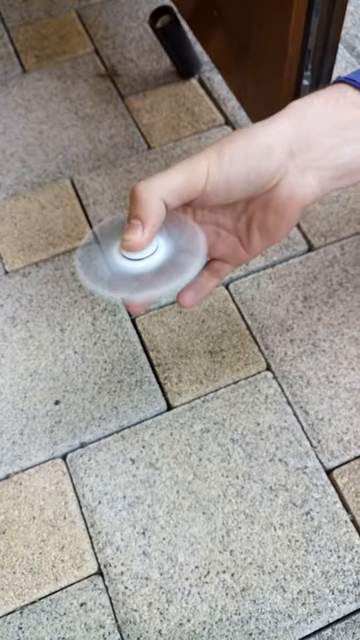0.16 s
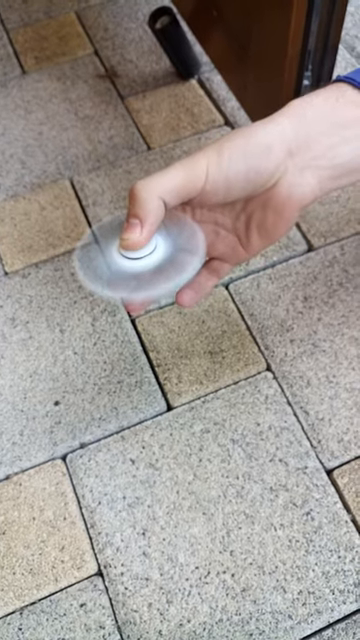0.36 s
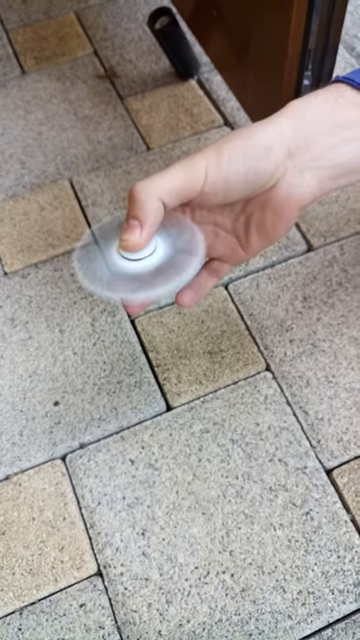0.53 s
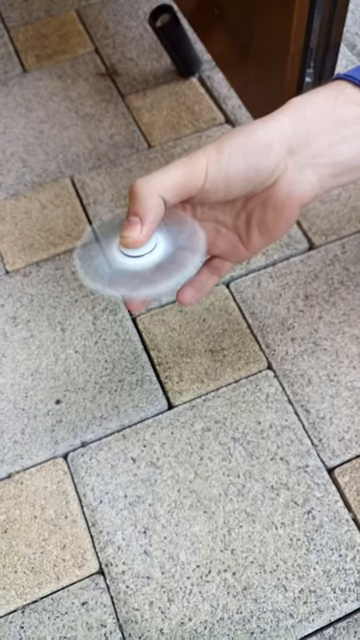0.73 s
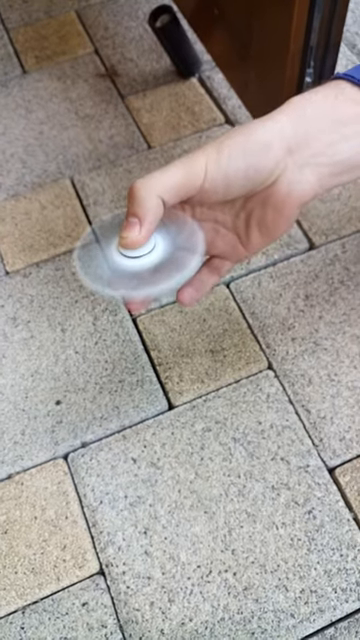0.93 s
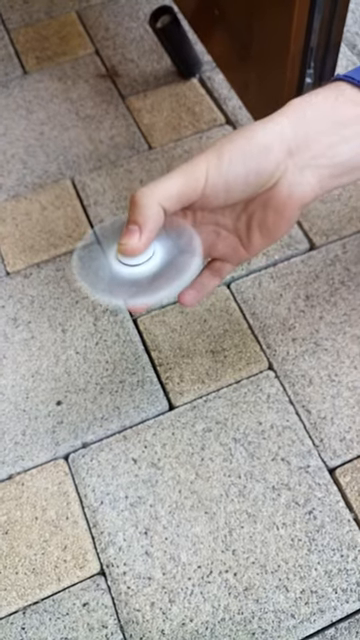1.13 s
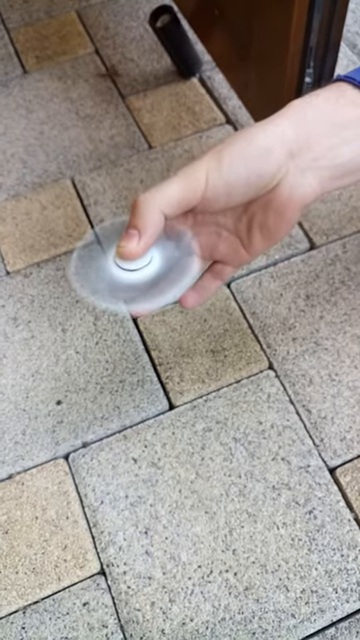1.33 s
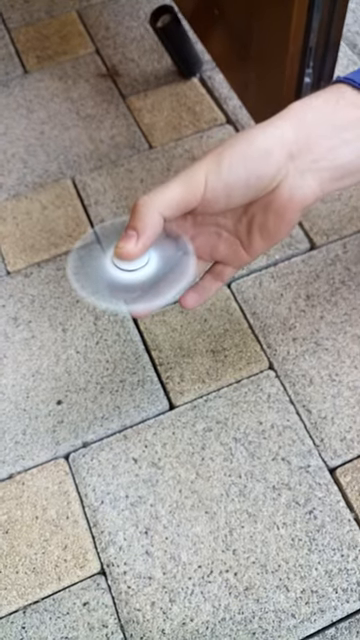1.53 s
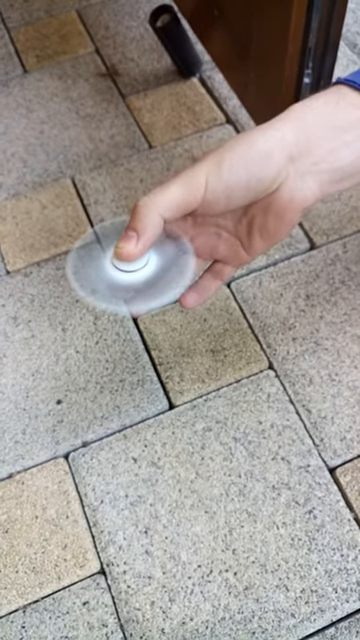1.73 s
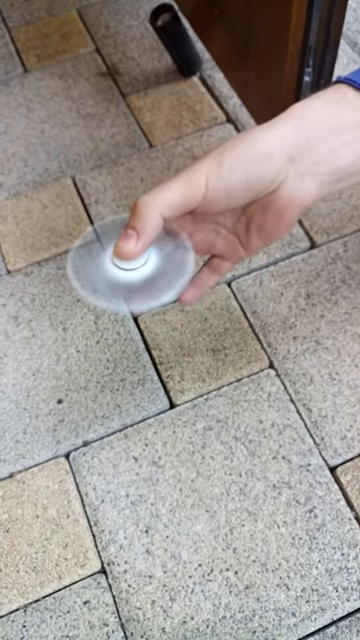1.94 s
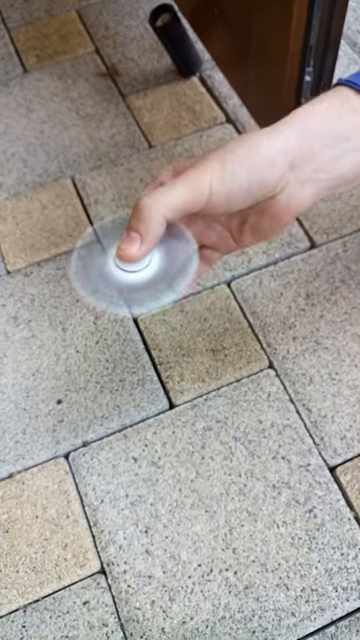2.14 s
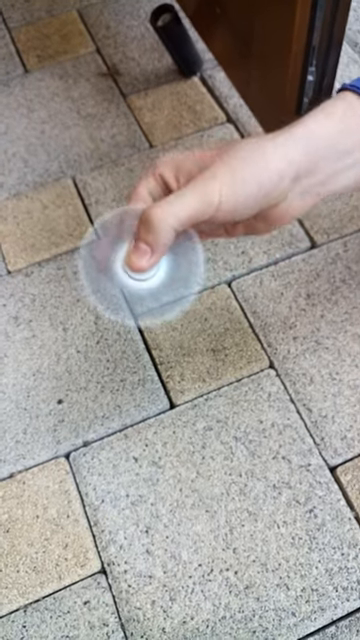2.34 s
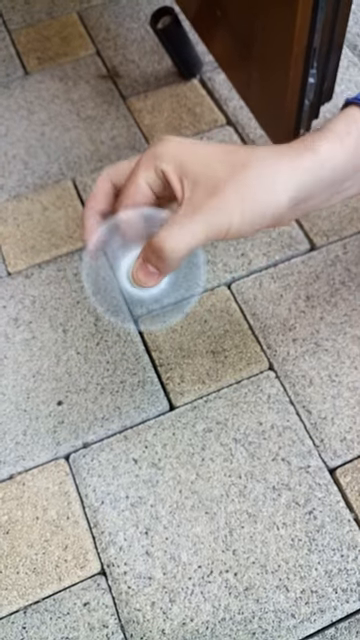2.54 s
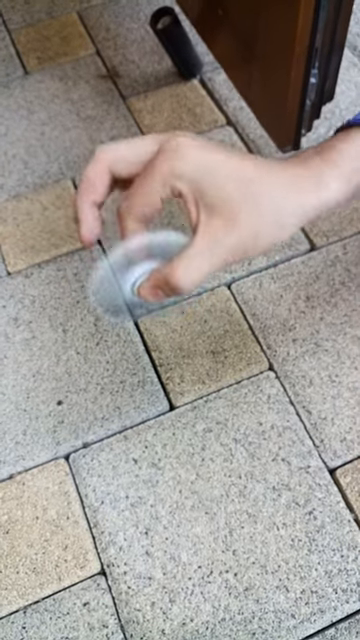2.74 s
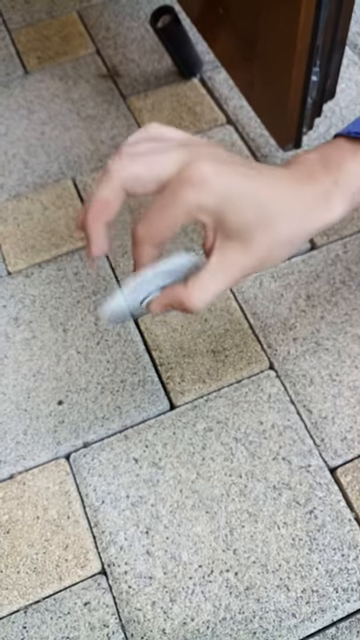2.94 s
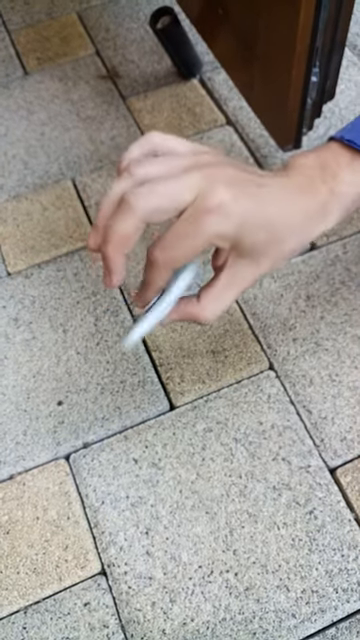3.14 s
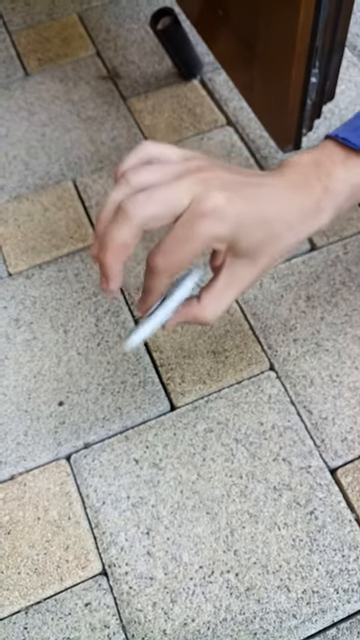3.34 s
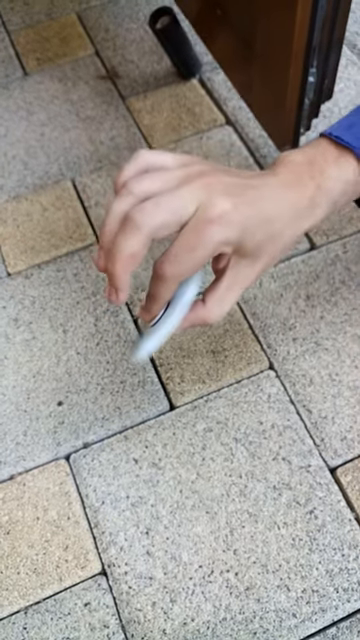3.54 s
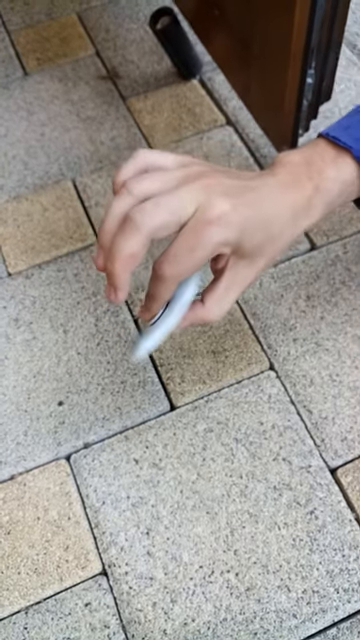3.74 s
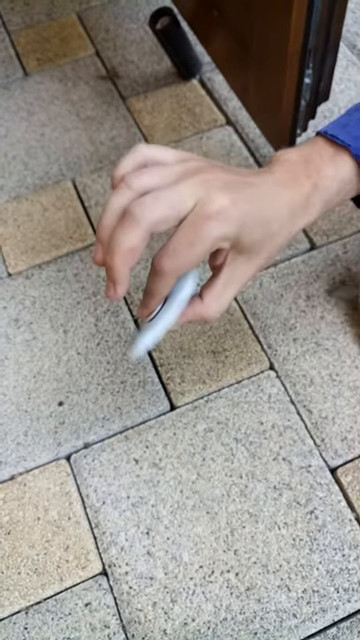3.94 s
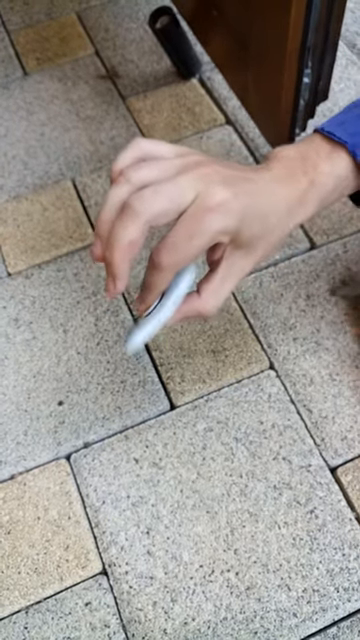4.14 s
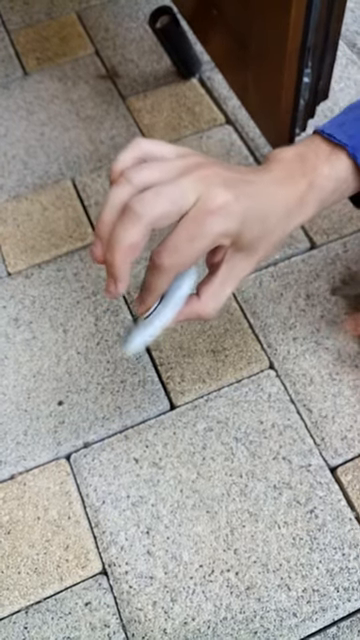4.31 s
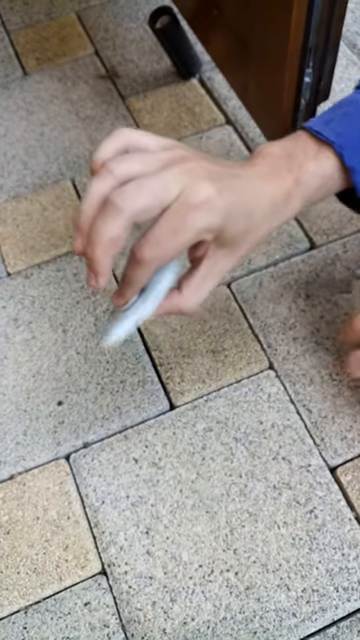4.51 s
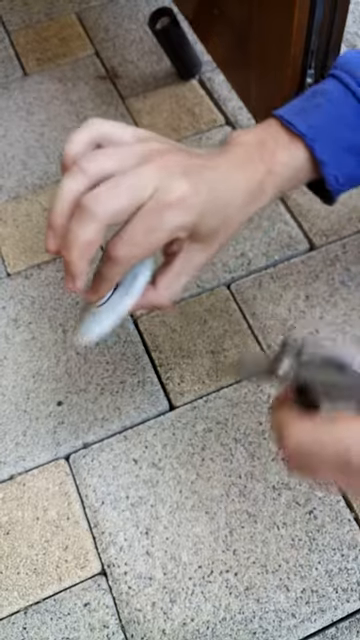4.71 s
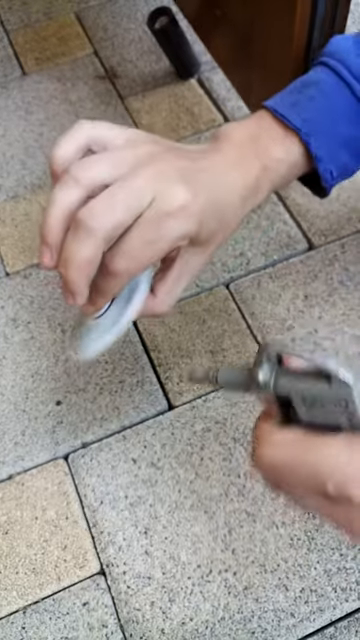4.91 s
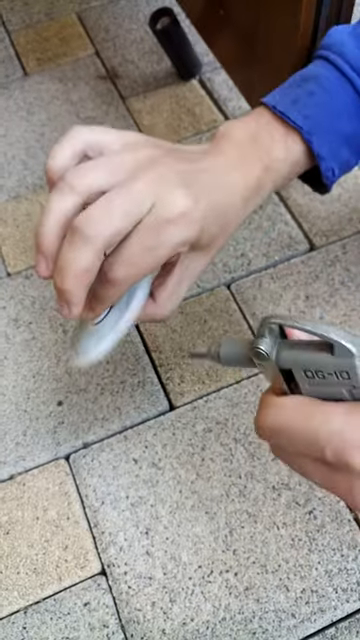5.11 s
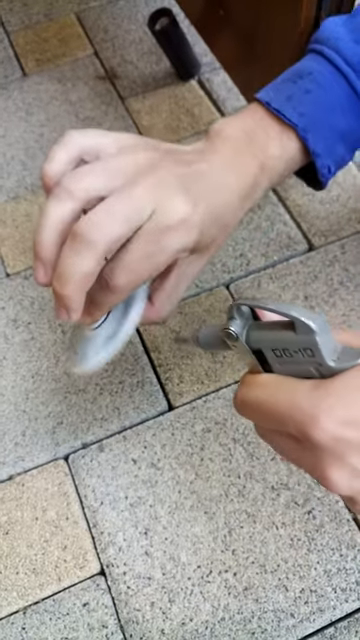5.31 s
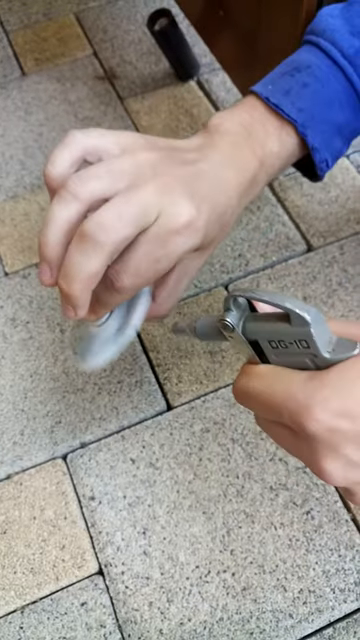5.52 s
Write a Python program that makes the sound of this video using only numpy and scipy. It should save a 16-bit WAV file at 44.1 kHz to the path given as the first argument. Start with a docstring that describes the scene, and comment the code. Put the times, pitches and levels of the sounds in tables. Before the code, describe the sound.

A thin, sandy bearing hiss flutters very quickly, nearly a buzz, as a spinning toy coasts between fingers outdoors. The hand turns it on edge, changing the colour of the hiss. Gentle phone-grip rumbles and knocks continue. Brief skin rub, crackling ticks and one crisp click follow, before an air gun spits open and roars against the rim, close and in stereo.

```python
"""Above a paved yard, a fidget spinner runs very fast between finger and thumb, close to a hand-held phone.
Its dry ball bearing is coloured noise, swung by the rotor's turns and slowly losing speed.
The hand turns it on edge; it ticks (noise bursts and ringing modes) and grazes the skin (grainy noise).
Then a blow gun opens and its air jet, noise broken by eddies, strikes the rim.
The phone rumbles and knocks softly in the grip, and its two microphone ports colour the hiss."""
import sys
import numpy as np
from scipy import signal
from scipy.fft import rfft, irfft, next_fast_len
from scipy.io import wavfile
from scipy.ndimage import uniform_filter1d

SR = 44100
rng = np.random.default_rng(int(sys.argv[2]) if len(sys.argv) > 2 else 0)


def digitize_waveform(pressure):
    """Quantize a signal to 16-bit integers and store it at the path in sys.argv[1].

    Rows of a 2-D input are taken as channels; values are limited to [-1, 1].
    """
    field = np.atleast_2d(pressure).T
    bounded = np.clip(field, -1, 1)
    quanta = np.round(bounded * 32767).astype(np.int16)
    wavfile.write(sys.argv[1], SR, quanta)


N = 245637
TIME = np.arange(N) / SR


def bearing(angle, rattle_db=0.63, flutter_db=1.0, low_db=-16.0, middle_db=-2.5, high_db=1.17):
    """Balls rattle in a dry race; the rotor's imbalance loads them once and twice a turn."""
    # hiss level, which follows the pinch of the fingers: (time [s], level [dB])
    pinch = [(0, -35.5), (1.1, -36.5), (1.42, -35), (1.72, -36), (2.2, -34.5), (2.63, -32.5), (2.88, -34.5),
             (2.98, -35.5), (3.15, -33), (3.35, -35.5), (3.7, -37.5), (3.82, -36), (4.1, -37), (4.44, -38),
             (4.9, -37.5)]
    # swing of the load, which follows the grip: (time [s], once a turn [dB], twice a turn [dB])
    wobble = [(0, .4, .6), (1.1, .4, .6), (1.4, 1.3, .8), (1.95, 1, .8), (2.25, .4, .4), (2.65, .7, 1.4),
              (3, .7, .7), (3.7, 1.2, .7), (4.5, 1.1, .7)]
    # spectrum of the bearing: (frequency [Hz], relative density [dB])
    bearing_colour = [(300, -20), (850, -12.5), (1300, -17), (1900, -10.5), (2300, -6.5), (2620, -6),
                      (2950, -1.5), (3600, 0.5), (5200, 4), (6700, 0.5), (7400, 0.5), (9500, -1.5),
                      (13000, -4.5), (16000, -3.5)]
    # the ports hear the spinner in step or opposed: (frequency [Hz], left-right likeness [-1 to 1])
    bearing_likeness = [(600, 0.33), (1200, -0.22), (2080, .4), (2420, -0.45), (2620, -0.65), (3000, -0.18),
                        (3650, -0.52), (4000, -0.04), (4400, -0.057), (5300, 0.54), (6500, .1),
                        (7500, 0.26), (8350, -0.8), (9000, 0.2), (12700, 0), (15000, 0.1)]
    # the treble dulls as the rotor slows and turns on edge
    dulling_db_per_s, edge_treble_db = -0.51, -1
    lows_follow = 0.29  # the lows take only this share of the hiss's swing

    level_db, = in_time(pinch)
    treble_db = dulling_db_per_s * TIME + edge_treble_db * on_edge()
    lows_db = (lows_follow - 1) * (level_db - level_db.mean())
    bands_db = [lows_db + low_db, middle_db, treble_db + high_db]
    hiss = blend(noise(bearing_colour, bearing_likeness), 2880, 7060, bands_db)
    hiss = mottle(hollows(hiss), depth_db=1.4)

    once_db, twice_db = in_time(wobble)
    load_db = once_db * np.sin(angle) + twice_db * np.sin(2 * angle)
    unsteady_db = rattle_db * drift(1300) + flutter_db * drift(46)
    return hiss * from_db(level_db + load_db + unsteady_db)


def rotor_angle():
    """The rotor coasts: friction takes away speed at a steady rate."""
    start_turns_per_s, slowing_turns_per_s2 = 51, 2.9
    turns_per_s = start_turns_per_s - slowing_turns_per_s2 * TIME
    return 2 * np.pi * np.cumsum(turns_per_s) / SR


def on_edge():
    """How far the hand has turned the spinner: 0 flat, 1 on edge."""
    # the turn of the hand: (start [s], end [s])
    hand_turns_s = (2.17, 2.3)
    return np.interp(TIME, hand_turns_s, [0, 1])


def hollows(x):
    """Hollows between palm and fingers: resonances and dips that come, sink in pitch and go as the hand opens."""
    # each strongest at one pose of the hand:
    # (frequency [Hz], width [Hz], left [dB], right [dB], pose [0 cupped to 1 open])
    hollow_rows = [(8400, 700, 6, 1.5, .05), (8250, 550, 3.5, 1, .42), (8050, 450, 3, 1, .75),
                   (7750, 300, -3.5, -1, .05), (7050, 300, -4, 1, .05), (6630, 380, 4, 1, .15),
                   (6080, 280, -3.5, -1, .2), (3520, 300, 1, 4, 0), (3180, 170, 0, -6, .1),
                   (3900, 220, 0, -4, 0), (13000, 1400, -3.5, 0, .1), (6620, 350, 2, 3, .35),
                   (5450, 320, -4.5, -2, .45), (7600, 320, -3, -3.5, .7), (2320, 260, 3, 0, .8),
                   (6150, 500, -4, 0, .85), (3200, 900, 3, 1.5, .9), (6500, 4000, 2, -1.5, 1),
                   (9800, 2200, -.5, -2.5, .9), (13000, 1500, -2, -1, .8)]
    hand_opens_s = (1.2, 3.4)  # from cupped to open
    pose_range = .33  # reach of a hollow on either side of its best pose
    sink = .035  # share by which the pitch sinks from cupped to open
    tremor_share = .007  # the unsteady fingers detune the hollows

    hz, s, frames = signal.stft(x, SR, nperseg=1024)
    pose = np.interp(s, hand_opens_s, [0, 1])
    tremor = tremor_share * np.interp(s, TIME, drift(3))
    colour_db = 0
    for centre_hz, width_hz, left_db, right_db, best_pose in hollow_rows:
        away = pose - best_pose
        moved_hz = centre_hz * (1 + tremor - sink * away)
        detuned = (hz[:, None] - moved_hz) / (width_hz / 2)
        presence = np.exp(-detuned ** 2 - (away / pose_range) ** 2)
        colour_db = colour_db + np.multiply.outer([left_db, right_db], presence)
    return signal.istft(frames * from_db(colour_db), SR)[1][:, :N]


def jet(low_db=-10.0, middle_db=-1.5, high_db=-1.0, pan_db=0.5, roar_pan_db=2.0):
    """The nozzle spits as the valve opens; the roar builds in surges as the jet finds the rim and forms eddies."""
    # how squarely the jet strikes the rim, as the level of its hiss: (time [s], level [dB])
    aim = [(4.98, -25), (5.03, -22.5), (5.075, -23), (5.11, -20.5), (5.15, -16.5), (5.205, -15),
           (5.29, -12), (5.37, -10), (5.43, -13), (5.475, -13), (5.545, -9.5), (5.57, -14.5)]
    # spectrum of the jet: (frequency [Hz], relative density [dB])
    jet_colour = [(40, -37), (200, -9.5), (880, -10.5), (1400, -11), (2200, -5), (2800, -2.5), (3300, 1.5),
                  (3750, -0.5), (4450, 1.8), (5150, 4), (5700, 3.5), (6400, 3.5), (7400, -0.5),
                  (8600, -4.5), (10500, -2.5), (13800, -1), (15000, 1.5), (16000, 2.5)]
    # how alike the two ports hear the jet: (frequency [Hz], left-right likeness [-1 to 1])
    jet_likeness = [(1200, 0.13), (2150, 0.38), (3000, 0.12), (3750, -.4), (4500, .1), (4950, -0.049),
                    (5500, 0.43), (6400, -.15), (7500, .15), (8300, -0.39), (9000, 0), (12200, .35),
                    (14000, -0.37), (15400, -0.061)]
    valve_opens_s, valve_rise_s = 4.9672, .0035
    # roar from the rim and treble from the nozzle, in dB for each dB of the hiss
    roar_follows, nozzle_follows = 1.13, 0.51
    # at the opening the treble overshoots, more on the left, while the body starts low and builds
    spit_db, spit_pan_db, spit_s = 4.0, 4.0, .018
    build_db, build_s = -9, .008
    eddy_db, eddies_per_s = 1.25, 170  # flutter of the jet
    # reflection off the fingers, whose path sways as the gun moves
    finger_echo_s, finger_sway_s, finger_gain = 0.0011, 0.00004, 0.2

    level_db, = in_time(aim)
    off_rim_db = level_db - level_db.max()
    open_s = np.maximum(TIME - valve_opens_s, 0)
    sides = np.array([[.5], [-.5]])
    building_db = build_db * np.exp(-open_s / build_s)
    spitting_db = (spit_db + spit_pan_db * sides) * np.exp(-open_s / spit_s)
    surge_db, flicker_db = .95 * drift(25), .8 * drift(35)
    roar_db = low_db + (roar_follows - 1) * off_rim_db + building_db + surge_db + roar_pan_db * sides
    treble_db = high_db + (nozzle_follows - 1) * off_rim_db + spitting_db + flicker_db

    bands_db = [roar_db, middle_db + building_db, treble_db]
    air = blend(noise(jet_colour, jet_likeness), 2730, 6350, bands_db)
    air = mottle(air, depth_db=1.8)
    valve = np.minimum(open_s / valve_rise_s, 1)
    air = valve * air * from_db(level_db + eddy_db * drift(eddies_per_s) + pan_db * sides)
    delays_s = [finger_echo_s + finger_sway_s * drift(2.5) for side in air]
    return echo(air, delays_s, finger_gain)


def ticks():
    """Hard little contacts: a crack with a sharp snap on top, then the spinner's modes at scattered strengths."""
    # contacts: (time [s], relative strength [dB], snap re that strength [dB])
    tick_rows = [(3.8954, -25, -7), (3.9024, -16, -5), (3.9058, -17, -10), (3.9076, -18.5, -10),
                 (3.9105, -21, -9), (3.9556, -21.5, -7), (3.9586, -19.5, -5), (3.9657, -16, -5),
                 (4.5532, -10, -.5)]
    # spectra of crack and snap: (frequency [Hz], relative density [dB])
    crack_colour = [(500, -12), (2000, 5.5), (4000, 7.5), (6000, 13), (7300, 12), (9000, -6), (16000, -14)]
    snap_colour = [(7000, -18), (9500, -9), (11500, 0), (13600, -1), (15000, -12), (16000, -12)]
    # the spinner's ring when struck: (frequency [Hz], relative level [dB], t60 [s])
    spinner_modes = [(2250, -12, .014), (3350, -11, .012), (4600, -6, .016), (5650, -6, .014),
                     (6250, -3, .035), (6520, -3, .035), (7200, -5, .025), (11500, -6, .008),
                     (12900, -5, .008)]
    crack_s, snap_s = .0016, .0011  # decay times
    burst_db, ring_db, scatter_db = -8.5, -14.5, 1.5

    s, strength_db, snap_db = np.transpose(tick_rows)
    at = np.round(s * SR).astype(int)
    clicks, snaps = np.zeros((2, N))
    clicks[at] = from_db(strength_db)
    snaps[at] = from_db(strength_db + snap_db)
    out = 0
    for hits, fade_s, colour in ((clicks, crack_s, crack_colour), (snaps, snap_s, snap_colour)):
        fading = signal.lfilter([1], [1, -np.exp(-1 / (fade_s * SR))], hits + 1e-18)
        out = out + from_db(burst_db) * fading * noise(colour, likeness=0.097)
    for hz, mode_db, t60 in spinner_modes:
        scattered_db = ring_db + mode_db + scatter_db * rng.standard_normal((2, N))
        out += ring(clicks * from_db(scattered_db), hz, t60)
    # the ticks carry next to nothing below about 2 kHz
    return signal.sosfilt(signal.butter(2, 1900, "high", fs=SR, output="sos"), out)


def grazes(grain_db=2.5):
    """Brief grainy rubs of skin on the running rim."""
    # rubs: (time of the middle [s], length [s], level [dB])
    graze_rows = [(3.24, .1, -43.5), (3.9105, .0018, -31.5), (3.914, .022, -46)]
    # spectrum of the rubbing: (frequency [Hz], relative density [dB])
    graze_colour = [(100, 1), (400, 7), (850, 12), (1300, 2), (2400, 16), (6000, 6.5), (9000, -1),
                    (16000, -19)]
    touch = sum(from_db(db) * np.exp(-2 * ((TIME - s) / length) ** 2) for s, length, db in graze_rows)
    return touch * noise(graze_colour, likeness=0.21) * from_db(grain_db * drift(430))


def handling(shift_db=-3.5, pan_db=-1.16, knock_s=0.00947, port_lag_s=0.00031):
    """The resting hand rumbles; slipping skin judders the case; soft knocks swell and die within a few cycles."""
    # soft knocks on the phone's case: (onset [s], pitch [Hz], relative peak [dB])
    knock_rows = [(0.15, 130, -28), (0.752, 140, -22), (0.843, 151, -25), (1.015, 185, -22),
                  (1.075, 153, -25.5), (1.365, 173, -29), (2.171, 133, -14), (2.255, 135, -19.5),
                  (2.325, 140, -30), (2.378, 123, -24.5), (3.088, 122, -26.5), (3.127, 155, -25.5),
                  (3.204, 58, -36), (3.235, 62, -38), (3.713, 138, -23.5), (4.288, 163, -20.5),
                  (4.308, 186, -24.5), (4.37, 119, -24), (4.464, 125, -35)]
    # spectra of the resting grip and the juddering case: (frequency [Hz], relative density [dB])
    rumble_colour = [(20, -15), (40, -18.5), (65, -4), (90, -7.5), (120, 3), (150, 2.5), (195, -6),
                     (245, -15.5), (330, -15.5), (450, -37), (900, -40), (3000, -83)]
    case_colour = [(20, -18), (75, -18.5), (115, -0.5), (165, 1), (205, -8), (245, -16), (330, -17),
                   (450, -42), (900, -36.5), (3000, -79)]
    grip_db, grip_settles_db_per_s = -35, -1.5

    rest = from_db(grip_db + grip_settles_db_per_s * TIME) * noise(rumble_colour, likeness=0.99)
    judder = noise(case_colour, likeness=1.0)
    # even out the swell of the judder
    judder = rms_one(judder / np.abs(signal.hilbert(judder)) ** .4)
    out = rest + from_db(shift_db) * shifts() * judder
    for s, hz, peak_db in knock_rows:
        age = TIME - s - knock_s  # counted from the peak
        swell = 1 / np.cosh(np.clip(1.7 * age / knock_s, -20, 20))
        out = out + from_db(peak_db) * np.cos(2 * np.pi * hz * age) * swell
    # the left port hears it later and at another level
    left = from_db(pan_db) * np.interp(TIME - port_lag_s, TIME, out[0])
    return np.array([left, out[1]])


def shifts():
    """Strength of the judder: each shift of the grip rises quickly, sags while it lasts and dies away."""
    # shifts of the grip: (time [s], length [s], relative level [dB])
    shift_rows = [(0.08, 0.046, -48), (0.36, 0.43, -35), (0.701, 0.24, -27.5), (0.986, 0.14, -30),
                  (1.23, 0.31, -37.5), (1.774, 0.084, -29), (2.138, 0.094, -31.5), (2.387, 0.09, -28.5),
                  (3.045, 0.035, -31), (3.695, 0.29, -33), (4.263, 0.19, -30.5), (4.662, 0.28, -36)]
    attack_s, sag_db_per_s, release_s = 0.022, -12, 0.11
    power = 0
    for s, length, db in shift_rows:
        age = np.maximum(TIME - s, 0)
        rise = np.minimum(age / attack_s, 1)
        release = np.exp(-np.maximum(age - length, 0) / release_s)
        power = power + (rise * release * from_db(db + sag_db_per_s * age)) ** 2
    return np.sqrt(power)


def background():
    """Background noise: low noise, louder at the start, settles to a steady level."""
    # spectrum of the background: (frequency [Hz], relative density [dB])
    background_colour = [(30, -21), (150, -5), (350, -0.5), (500, 0.5), (850, -8), (1300, -53), (4000, -11)]
    steady_db, settling_db, settling_s = -50.5, 7.5, 0.99
    level_db = steady_db + settling_db * np.exp(-TIME / settling_s)
    return from_db(level_db) * noise(background_colour, likeness=0.73)


def reflections(near):
    """Hand, paving and door each send back one weak copy; the two farther paths sway slightly."""
    turned = on_edge()
    sway_s = .00002 * drift(1)
    near = echo(near, [.0019 - 0.00038 * turned, 0.0018 + 0.00031 * turned], gain=0.041)  # hand
    near = echo(near, [.0052 + sway_s, 0.0071 + sway_s], gain=0.16)  # paving
    return echo(near, [.0082 - sway_s, .0089 - sway_s], gain=0.17)  # door


def from_db(db):
    """Decibels to gain."""
    return 10 ** (np.asarray(db) / 20)


def rms_one(x):
    """Scale to unit rms."""
    return x / np.sqrt(np.mean(x ** 2) + 1e-20)


def in_time(rows):
    """Each column of a curve table at every sample."""
    s, *columns = np.transpose(rows)
    return [np.interp(TIME, s, c) for c in columns]


def drift(rate):
    """Random wander of spread 1 that changes about rate times a second."""
    size = next_fast_len(N)
    hz = np.arange(size // 2 + 1) * SR / size
    spectrum = rfft(rng.standard_normal(size)) / (1 + (hz / rate) ** 2)
    return rms_one(irfft(spectrum, size)[:N])


def noise(colour, likeness):
    """Stereo noise of rms 1 with a given spectrum and left-right likeness (one value, or a table over pitch)."""
    size = next_fast_len(N)
    hz = np.maximum(np.arange(size // 2 + 1) * SR / size, 1)
    points_hz, points_db = np.transpose(colour)
    gain = from_db(np.interp(np.log(hz), np.log(points_hz), points_db))
    mid, side = rfft(rng.standard_normal((2, size))) * gain
    alike = np.interp(hz, *np.transpose(likeness)) if np.ndim(likeness) else likeness
    alike = np.clip(alike, -1, 1)
    spectra = np.sqrt(1 + alike) * mid + np.sqrt(1 - alike) * side * [[1], [-1]]
    return rms_one(irfft(spectra, size)[:, :N])


def blend(x, low_hz, high_hz, levels_db):
    """Split a noise into lows, middle and treble, and play each at its own level."""
    low = signal.sosfiltfilt(signal.butter(4, low_hz, "low", fs=SR, output="sos"), x)
    high = signal.sosfiltfilt(signal.butter(4, high_hz, "high", fs=SR, output="sos"), x)
    bands = (low, x - low - high, high)
    return sum(from_db(db) * rms_one(band) for db, band in zip(levels_db, bands))


def mottle(x, depth_db):
    """Patches of the spectrum, a few hundred hertz wide, swell and fade at random."""
    frames = signal.stft(x, SR, nperseg=512)[2]
    patches = rng.standard_normal(frames.shape)
    # smooth twice over pitch (axis 1) and twice over time (axis 2)
    for axis in (1, 1, 2, 2):
        patches = uniform_filter1d(patches, size=3 if axis == 1 else 9, axis=axis)
    return signal.istft(frames * from_db(depth_db * rms_one(patches)), SR)[1][:, :N]


def ring(clicks, hz, t60):
    """A unit click sets a decaying sine of height 1 ringing."""
    r, w = np.exp(-np.log(1000) / (t60 * SR)), 2 * np.pi * hz / SR
    return signal.lfilter([0, np.sin(w)], [1, -2 * r * np.cos(w), r * r], clicks + 1e-18)


def echo(x, delay_s, gain):
    """Add one reflection whose path may change; one delay for each side."""
    delayed = [np.interp(TIME - d, TIME, side, left=0) for side, d in zip(x, delay_s)]
    return x + gain * np.array(delayed)


def resonate(x, peaks):
    """A chain of resonant peaks and dips."""
    for hz, width_hz, gain_db in peaks:
        height = from_db(gain_db / 2)
        damp = np.tan(np.pi * width_hz / SR)
        cosine = np.cos(2 * np.pi * hz / SR)
        top = [1 + damp * height, -2 * cosine, 1 - damp * height]
        bottom = [1 + damp / height, -2 * cosine, 1 - damp / height]
        x = signal.lfilter(top, bottom, x)
    return x


def scene():
    """Spinner and jet with their reflections from hand, paving and door, over handling and background noise."""
    near = bearing(rotor_angle()) + jet() + ticks() + grazes()
    return reflections(near) + handling() + background()


def record(dry, ceiling=0.78):
    """Each microphone port rings in its own way; the loudest peaks are rounded and the top is cut."""
    # resonances of the ports: (frequency [Hz], width [Hz], gain [dB])
    left_port = [(1450, 380, 3.5), (2650, 150, -1), (3440, 120, 1), (4454, 1280, 7), (4850, 420, 2.5),
                 (6940, 1200, 0), (8800, 320, 0), (13000, 1600, -1.5), (15190, 1770, 12.5)]
    right_port = [(1410, 440, -4.5), (2800, 250, 1), (4300, 3200, -4.5), (8200, 300, -6.5), (9100, 300, -7),
                  (15320, 3500, 11.5)]
    cutoff_hz = 15480
    left = from_db(0.78) * resonate(dry[0], left_port)
    right = from_db(-0.27) * resonate(dry[1], right_port)
    rounded = ceiling * np.tanh(np.array([left, right]) / ceiling)
    return signal.sosfilt(signal.ellip(12, .2, 80, cutoff_hz, fs=SR, output="sos"), rounded)


dry = scene()
out = record(dry)
digitize_waveform(out)
```